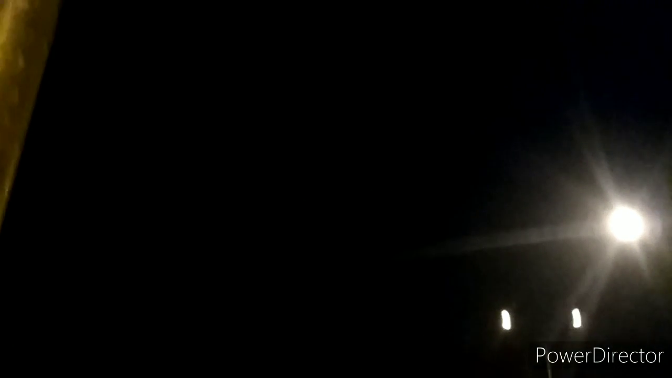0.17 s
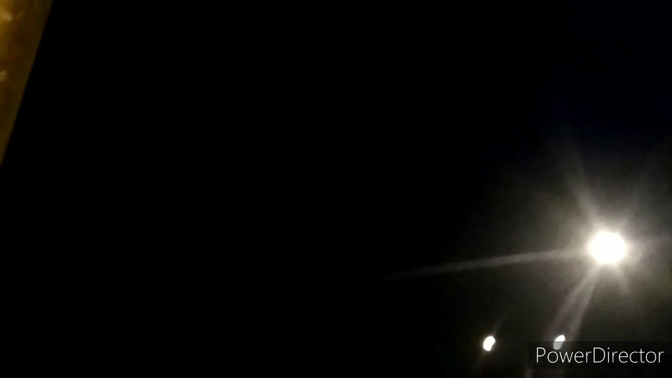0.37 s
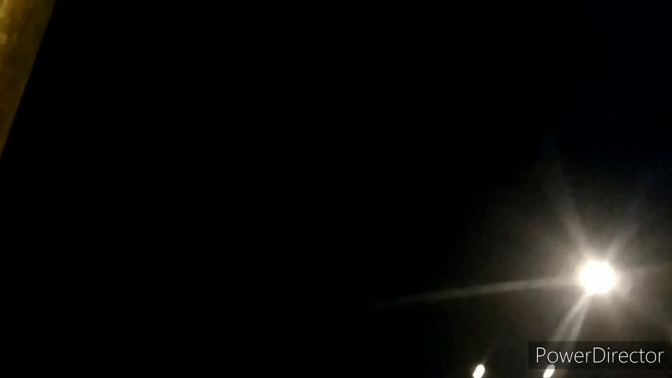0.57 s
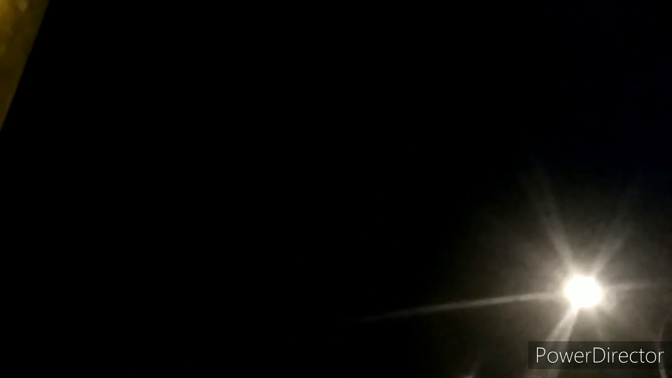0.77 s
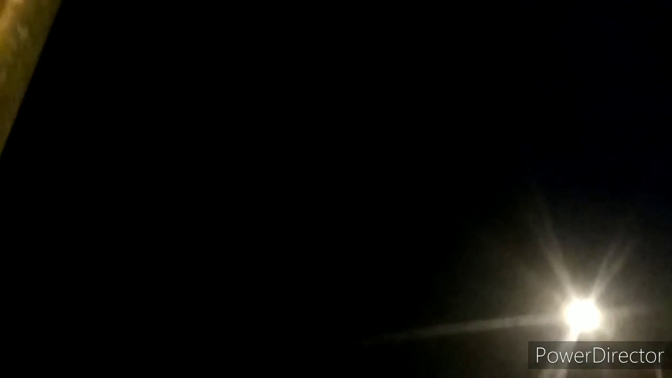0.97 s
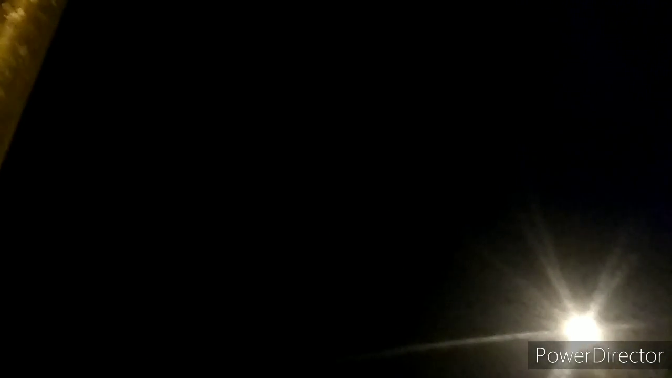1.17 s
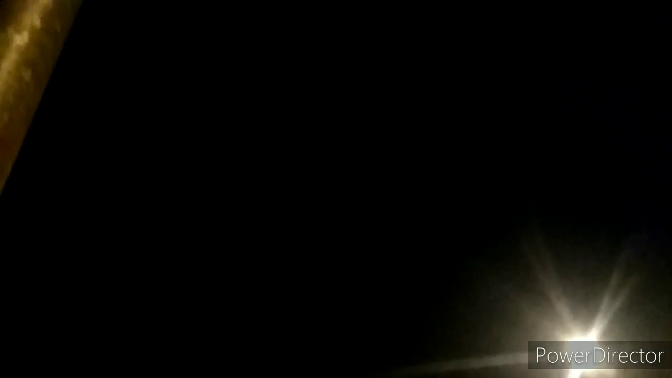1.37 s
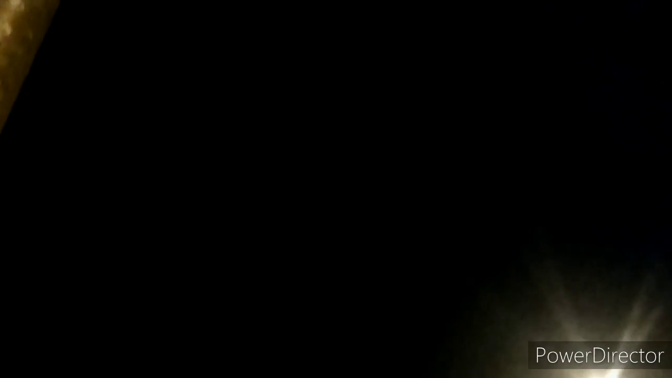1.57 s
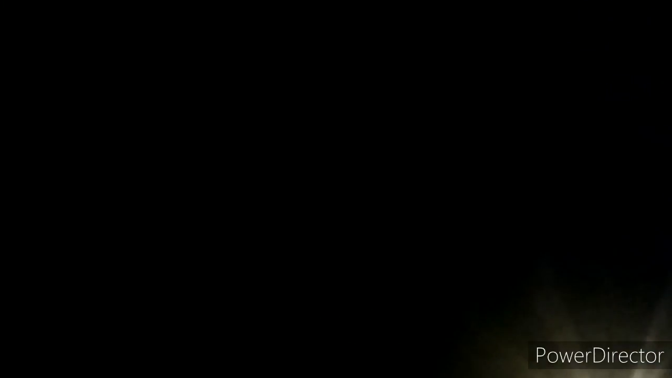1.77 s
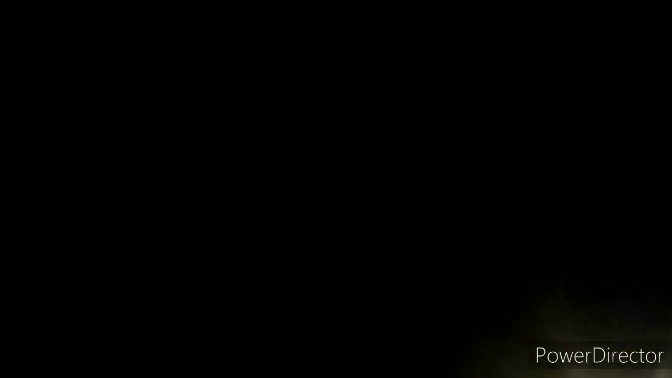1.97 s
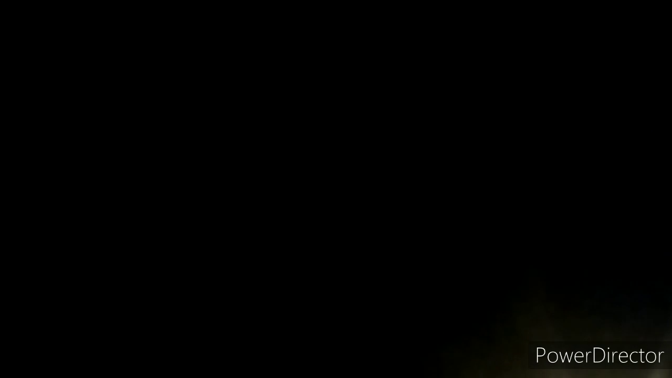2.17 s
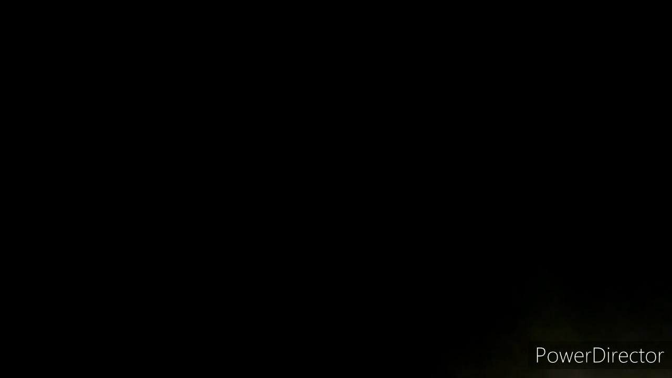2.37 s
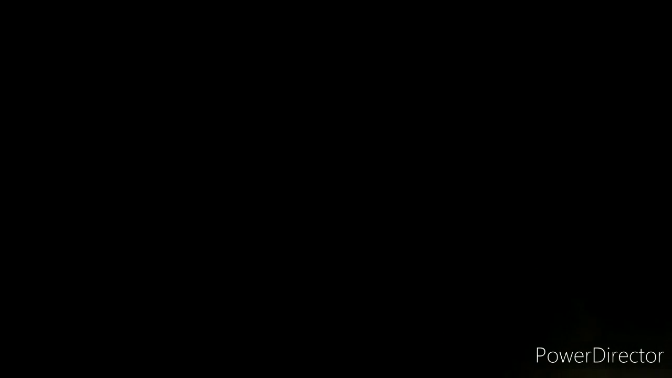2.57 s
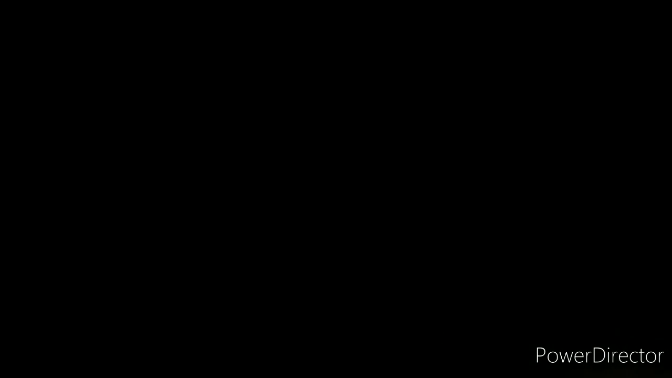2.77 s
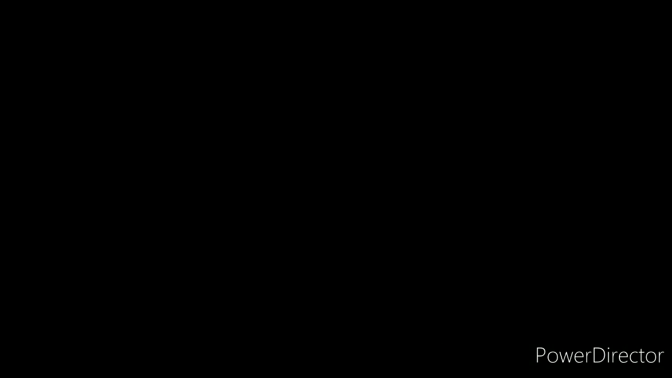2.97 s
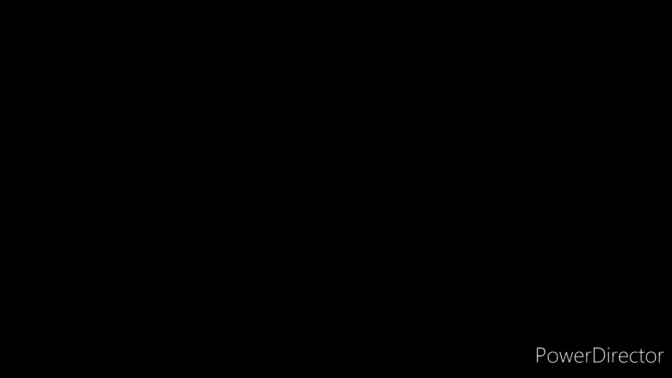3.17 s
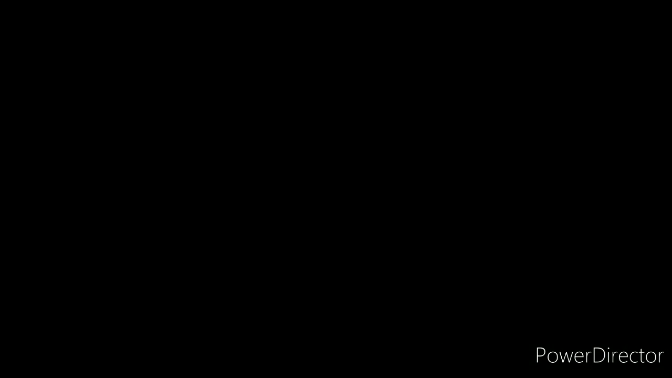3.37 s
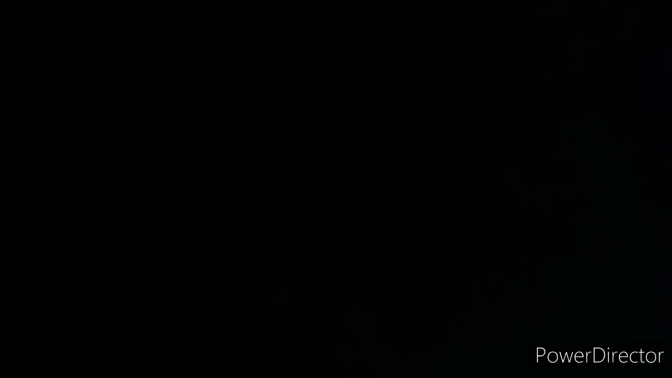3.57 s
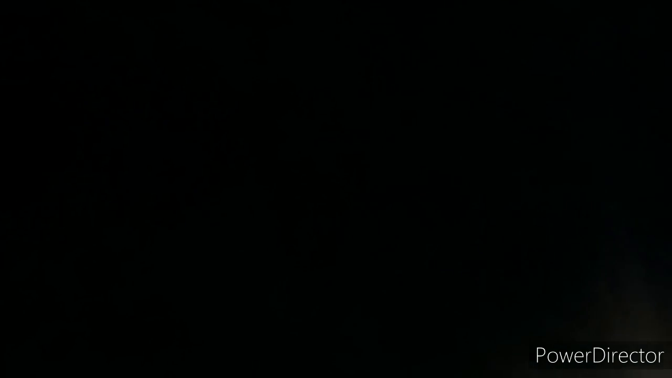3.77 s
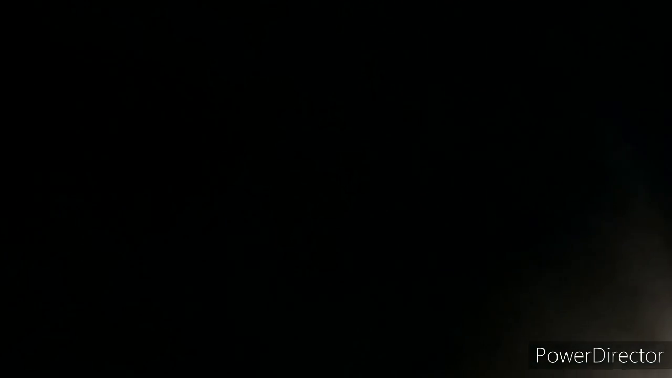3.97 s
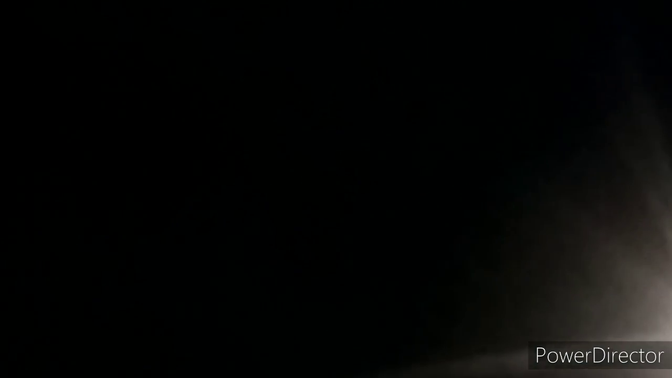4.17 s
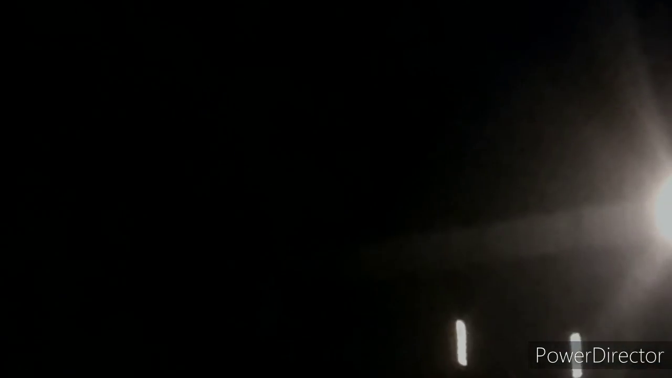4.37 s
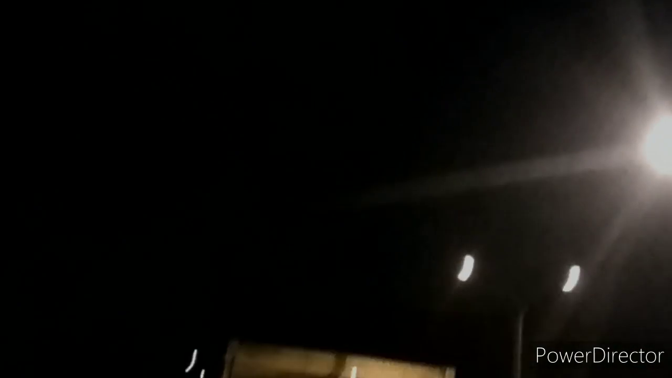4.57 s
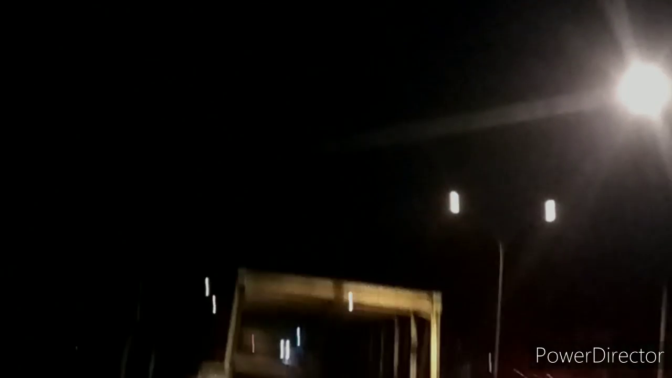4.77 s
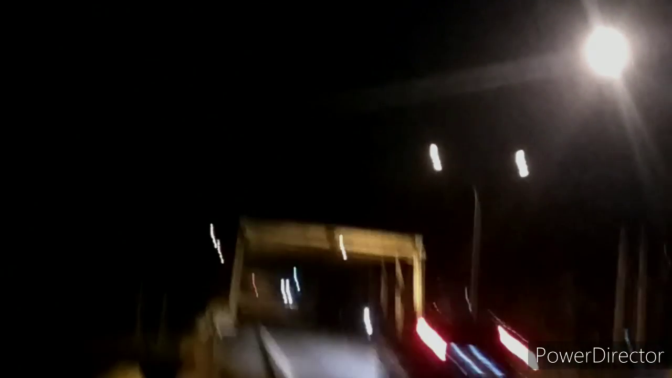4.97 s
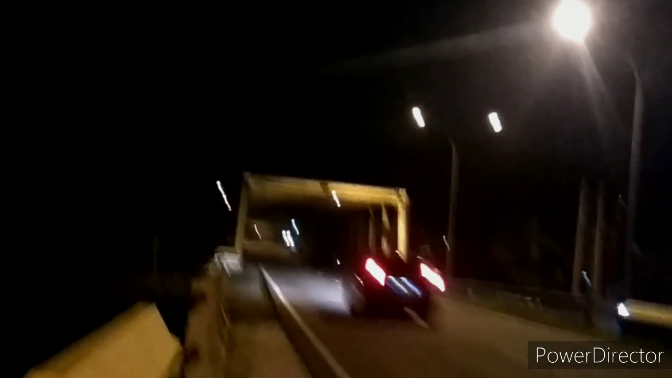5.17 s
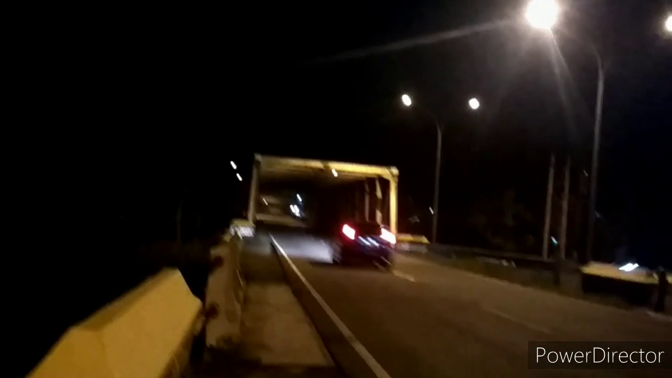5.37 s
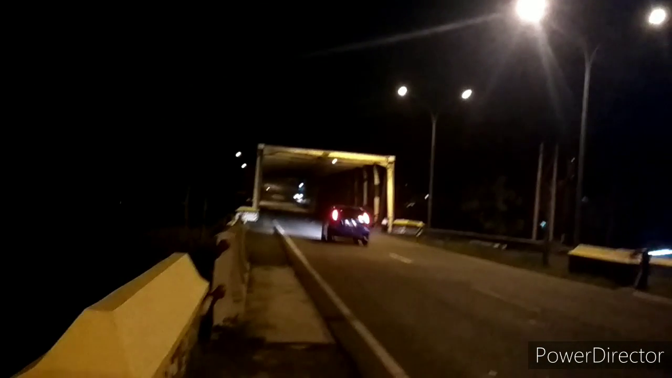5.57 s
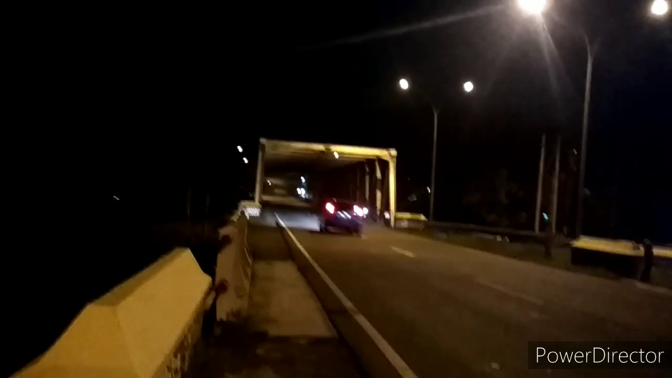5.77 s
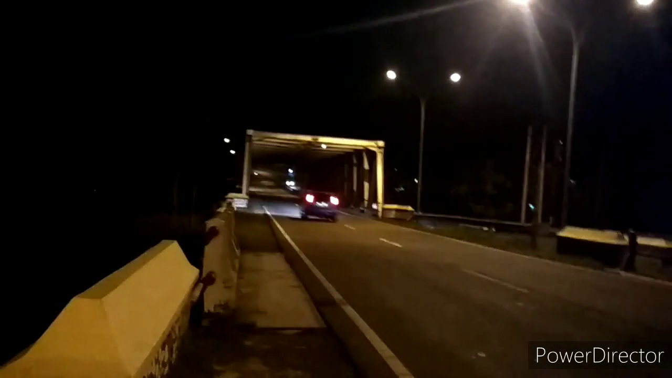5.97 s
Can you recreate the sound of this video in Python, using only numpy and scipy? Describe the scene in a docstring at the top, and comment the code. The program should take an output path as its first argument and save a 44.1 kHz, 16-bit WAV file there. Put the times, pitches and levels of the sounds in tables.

```python
"""A single-cylinder motorbike thuds past on hissing tyres and rides away, heard from the footway of a
road bridge at night. Each thud is a puff of exhaust gas ringing the silencer. After a brief break in
the sound a car passes and drives on toward the steel span: its engine drones, its tyres roar and its
wheels thump and knock on the deck. A cricket chirps by the road while the car goes by, and far-off
traffic rumbles under both vehicles."""
import sys
import numpy as np
from scipy import signal
from scipy.fft import rfft, irfft, next_fast_len
from scipy.io import wavfile
from scipy.ndimage import uniform_filter1d, minimum_filter1d, map_coordinates

SR = 44100
rng = np.random.default_rng(int(sys.argv[2]) if len(sys.argv) > 2 else 0)


def dump_mix(stems):
    """Bounce the given channels to the path in sys.argv[1] as a 16-bit WAV at rate SR."""
    frames = np.atleast_2d(stems).T  # one column per channel
    limited = np.clip(frames, -1, 1)  # hard clip at full scale
    pcm = np.round(limited * 32767).astype(np.int16)
    wavfile.write(sys.argv[1], SR, pcm)


N = 265923

# How often each engine fires; the rate sinks as the vehicle goes by: t/s, f/Hz
BIKE_FIRING = [(0, 32.5), (.8, 32.3), (1.18, 31.8), (1.3, 30.5), (1.5, 30.1), (1.8, 29.3), (2.3, 28.8),
               (3.5, 29.1)]
CAR_FIRING = [(3.55, 62.47), (4.2, 60.83), (4.8, 59.95), (5.2, 59.22), (5.55, 58.3), (6.03, 58.3)]
# How much louder each pitch of noise is on the left (+) or right (-): f/Hz, level/dB
BIKE_BALANCE = [(800, -1), (1100, 10.5), (1400, -3), (2500, -2.5), (4000, -3.5), (6000, -8), (8500, -9),
                (10500, -3.5), (13000, 0)]
CAR_BALANCE = [(1500, 0.5), (2200, 2.5), (3500, -2.5), (5000, -0.5), (8000, -1.5), (10800, -9), (12500, -2),
               (14500, 3)]
# The sound breaks off between the two vehicles and fades back in: t/s, level/dB
BREAK = [(3.521, 0), (3.54, -39), (3.55, -32), (3.557, -11), (3.71, 0)]

CAR_START_S = BREAK[1][0]
BIKE_NEAREST_S, BIKE_WIDTH_S = 1.3547, 0.43
UNMASK_S = (0.69, 0.804)  # from, to: the bike's body stops hiding the exhaust pipe
EASING_S = (1.62, 1.92)  # the throttle eases
TURN_AWAY_S = (2.6, 2.72)  # the pipe comes round to face us
THROTTLE_ATTACK_S, THROTTLE_RELEASE_S = 0.048, 0.079  # the engine takes this long to follow
CAR_TREAD_PEAK_S = 4.98


def amp(db):
    """Turns decibels into a number to multiply a sound by."""
    return 10 ** (np.asarray(db) / 20)


def unit(x):
    """Scales a signal to an average strength (rms) of 1."""
    return x / np.sqrt(np.mean(x ** 2) + 1e-20)


def clock():
    """The time of every sample, in seconds."""
    return np.arange(N) / SR


def along(points, hz):
    """Reads between the rows of a frequency table, on a musical (log) scale."""
    freqs, values = np.transpose(points)
    return np.interp(np.log(hz + 1), np.log(freqs + 1), values)


def curve(rows):
    """Joins (time, value) rows with straight lines, giving one value per sample."""
    return np.interp(clock(), *np.transpose(rows))


def wobble(rate):
    """A smooth random curve through `rate` new values a second."""
    return map_coordinates(rng.standard_normal(int(N * rate / SR) + 4), [clock() * rate])


def ramp(start, stop):
    """Rises from 0 to 1 between two times."""
    return np.clip((clock() - start) / max(stop - start, 1 / SR), 0, 1)


def held(start, stop, attack, release):
    """Stays at 1 between two times, fading in before and out after."""
    return ramp(start - attack, start) - ramp(stop, stop + release)


def distance(nearest_s, width_s):
    """How far off a vehicle on a straight road is; 1 is its closest. A small width is a quick pass."""
    return np.hypot(1, (clock() - nearest_s) / width_s)


def passing(peak_db, nearest_s, width_s, fall_db):
    """Level in dB of a sound going by; it loses fall_db at ten times the distance."""
    return peak_db - fall_db * np.log10(distance(nearest_s, width_s))


def filtered(x, response):
    """Multiplies each frequency in x by response(hz)."""
    size = next_fast_len(N + SR // 2)
    return irfft(rfft(x, size) * response(np.fft.rfftfreq(size, 1 / SR)), size)[..., :N]


def ring(x, spectrum, size=16384):
    """Lets x ring a hollow body whose tone is the given spectrum."""
    cepstrum = irfft(np.log(amp(along(spectrum, np.fft.rfftfreq(size, 1 / SR)))))
    cepstrum[1:size // 2] *= 2  # this folding makes the ringing follow the hit, never precede it
    cepstrum[size // 2 + 1:] = 0
    ringing = irfft(np.exp(rfft(cepstrum)))
    return signal.fftconvolve(x, ringing / np.linalg.norm(ringing))[:N]


def placed(x, ahead_ms=0.094, beside_ms=0.35):
    """Makes stereo: the more the vehicle is beside us, the earlier its sound arrives on the left."""
    bike_beside = 1 / distance(BIKE_NEAREST_S, BIKE_WIDTH_S) ** 2
    car_beside = 1 - ramp(4.58, 5.2)
    beside = np.where(clock() < CAR_START_S, bike_beside, car_beside)
    lead = (ahead_ms + (beside_ms - ahead_ms) * beside) / 1000 * SR
    return np.array([map_coordinates(x, [np.arange(N) + side * lead / 2]) for side in (1, -1)])


def rush(spectrum, balance, direct, flutter_db, left_to_right_ms=0.49):
    """Fluttering stereo noise of rms 1: a direct share from the vehicle, the rest from all around."""
    # long, low waves reach both sides alike; short, high ones do not
    spread = lambda hz: np.arccos(np.sinc(2 * hz * left_to_right_ms / 1000)) / 2
    white = rng.standard_normal((2, N))
    mid, side = filtered(white, lambda hz: np.array([np.cos(spread(hz)), np.sin(spread(hz))]))
    around = np.sqrt(1 - direct) * np.array([mid + side, mid - side])
    straight = np.sqrt(direct) * placed(rng.standard_normal(N))
    colour = lambda hz: amp(along(spectrum, hz) + along(balance, hz) * np.array([[.5], [-.5]]))
    return unit(filtered(around + straight, colour) * amp(flutter_db * wobble(35)))


def patchy(x, depth_db):
    """Narrow bands of a noise swell and sink by themselves, so it sounds hollow and wavering."""
    bands = signal.stft(x, nperseg=1024)[2]
    swell = uniform_filter1d(rng.standard_normal(bands.shape[1:]), size=4, axis=0)
    swell = uniform_filter1d(swell, size=9, axis=1)
    return unit(signal.istft(bands * amp(depth_db * unit(swell)), nperseg=1024)[1][:, :N])


def distant_traffic(db=-45):
    """A low, steady rumble from the road beyond the bridge."""
    # Tone of the rumble: f/Hz, level/dB
    rumble_tone = [(25, -3), (60, 4), (100, 8.5), (145, -32), (200, 9), (250, -11), (400, -26), (520, -13),
                   (1000, -53)]
    return amp(db) * rush(rumble_tone, CAR_BALANCE, direct=0.07, flutter_db=2)


def bike_tyres(throb_db=0.5):
    """Tyres rush on the asphalt and their tread sings; the high hiss throbs a little with the engine."""
    # Tones of the low roll, brighter rush, singing tread and high hiss: f/Hz, level/dB
    roll_tone = [(25, -10), (65, -3), (150, -10), (380, -10.5), (520, -30), (620, -7.5), (710, 0.5),
                 (920, 3), (1070, -5.5), (1200, -55), (1600, -89)]
    rush_tone = [(700, -41), (1190, -17), (1360, 1), (1700, -3), (1950, -1.5), (2800, -6), (3600, -23),
                 (4100, -46), (4900, -29), (7000, -22.5)]
    tread_tone = [(1000, -23), (1270, 4.5), (1400, 3), (1650, -8.5), (2300, -58)]
    hiss_tone = [(2000, -8), (3700, -7), (4300, -7.5), (4900, -32), (5600, -8.5), (8300, -8), (10000, 0),
                 (12500, 2), (15500, 0)]
    roll = patchy(rush(roll_tone, BIKE_BALANCE, direct=.3, flutter_db=1.5), depth_db=3)
    bright = patchy(rush(rush_tone, BIKE_BALANCE, direct=.25, flutter_db=1), depth_db=2.3)
    tread = patchy(rush(tread_tone, BIKE_BALANCE, direct=.3, flutter_db=1.2), depth_db=2.8)
    hiss = patchy(rush(hiss_tone, BIKE_BALANCE, direct=.1, flutter_db=.7), depth_db=3.2)
    # hypot adds the pass to a bed of road noise that slowly grows
    tyre_gain = np.hypot(amp(passing(-38, 1.35, 0.25, 25)), amp(-39 + 0.99 * clock()))
    hiss_gain = np.hypot(amp(passing(-28, 1.57, 0.66, 43.5)), amp(-45 + 2.37 * clock()))
    hiss_gain *= amp(4 + throb_db * np.cos(2 * np.pi * bike_cycles()))
    tread_gain = amp(passing(-34, 1.8, 1.26, 64)) * ramp(*UNMASK_S)
    return tyre_gain * (roll + amp(4) * bright) + tread_gain * tread + hiss_gain * hiss


def bike_cycles(zero_s=1.138):
    """Counts engine cycles from a strong firing just before the bike is nearest."""
    cycles = np.cumsum(curve(BIKE_FIRING)) / SR
    return cycles - np.interp(zero_s, clock(), cycles)


def exhaust_level(hidden_db=-13.5, pull_db_per_s=20):
    """Distance, the bike's body in the way, the throttle and pulling away set the exhaust's dB."""
    # Twists of the throttle: opens t/s, closes t/s, boost over idle/dB
    twists = [(0.53, 0.584, 16.5), (0.835, 1.87, 5.5), (2.018, 2.135, 7.5), (2.683, 2.774, 2),
              (3.43, 3.455, 4.5)]
    throttle_db = sum(db * held(opens, closes, THROTTLE_ATTACK_S, THROTTLE_RELEASE_S)
                      for opens, closes, db in twists)
    pull_db = pull_db_per_s * np.maximum(clock() - TURN_AWAY_S[0], 0)
    pass_db = passing(-17.5, BIKE_NEAREST_S, BIKE_WIDTH_S, 38.5)
    return pass_db + hidden_db * (1 - ramp(*UNMASK_S)) + throttle_db + pull_db


def exhaust_puffs(level_db, away, echoes=6):
    """One puff per firing, with echoes off the railings. Returns ordinary and hard puffs apart."""
    # Far firings are more uneven and echo more: distance (1 = closest), scatter/dB, echo strength
    near_far = [(1.4, 0.5, 0.12), (2.5, 1.3, 0.36)]
    # Single firings that bark out: t/s, level change/dB
    hard_firings = [(1.872, 1.5), (1.975, 3.5), (2.045, 1.5), (2.115, 8), (2.22, 10), (2.46, 3.5),
                    (2.70, 7), (2.80, 3.5), (2.90, 0), (2.94, 6), (3.01, 4), (3.115, 5), (3.18, 2.5),
                    (3.32, 5.5), (3.425, 2), (3.455, 5.5), (3.49, -2.5)]
    cycle = np.floor(bike_cycles())
    fired = np.flatnonzero(np.diff(cycle)) + 1  # the sample at which each firing falls
    count = len(fired)
    reach, *columns = np.transpose(near_far)
    scatter_db, echo = (np.interp(away[fired], reach, column) for column in columns)
    # every third firing is weak and a little late; every second one while the throttle eases
    easing = (fired > EASING_S[0] * SR) & (fired < EASING_S[1] * SR)
    weak = np.where(easing, cycle[fired] % 2 == 1, cycle[fired] % 3 == 2)
    hard_db = np.zeros(count)
    for s, db in hard_firings:
        hard_db[np.argmin(np.abs(fired / SR - s))] += db
    size = amp(level_db[fired] + hard_db - 5.5 * weak + scatter_db * rng.standard_normal(count))
    when = fired + SR * (.0007 * weak + .0002 * rng.standard_normal(count))
    # each puff arrives directly, then along new echo paths
    delays_s = np.c_[np.zeros(count), rng.uniform(.004, .04, (count, echoes))]
    gains = np.c_[np.ones(count), echo[:, None] * rng.standard_normal((count, echoes))]
    spacing = SR / curve(BIKE_FIRING)[fired]
    gains *= (size / np.linalg.norm(gains, axis=1) * np.sqrt(spacing))[:, None]
    arrivals = np.abs(when[:, None] + SR * delays_s).astype(int)
    return np.array([np.bincount(arrivals[kind].ravel(), gains[kind].ravel(), N)[:N]
                     for kind in (hard_db == 0, hard_db != 0)])


def muffled(thuds, hidden, cutoff_hz=212):
    """The note is dull while the pipe is hidden or the bike coasts; a throttle blip partly clears it."""
    dull = filtered(thuds, lambda hz: 1 / np.hypot(1, (hz / cutoff_hz) ** 4))
    coasting = ramp(1.45, 2.0) - ramp(2.58, 2.85)
    blip = held(2.11, 2.18, THROTTLE_ATTACK_S / 2, THROTTLE_RELEASE_S)
    dull_share = np.clip(hidden + .98 * coasting - .45 * blip, 0, 1)
    return thuds * (1 - dull_share) + dull * dull_share


def bike_exhaust(round_trip_s=.0063, returning_share=.36, leak_share=.22):
    """Puffs run up and down the pipe and ring the silencer; the tone rises once the pipe faces us."""
    # The silencer from the side, from behind, and from behind on a hard firing: f/Hz, level/dB
    side_tone = [(25, -44), (58, -1), (90, 4), (122, 1.5), (158, -0.5), (188, 2.5), (222, -10),
                 (260, -13.5), (315, -15), (345, -23.5), (400, -32), (480, -42), (1200, -66)]
    rear_tone = [(25, -26), (70, -18), (120, -6.5), (160, -9), (195, 5.5), (245, -4.5), (300, 2),
                 (360, -4.5), (440, -16.5), (540, -58), (1200, -63)]
    bark_tone = [(25, -33), (70, -19), (120, -4), (170, 0), (215, 5.5), (260, 1.5), (320, -1), (370, -11.5),
                 (440, -24), (540, -50), (1200, -64)]
    level_db = exhaust_level()
    hidden = 1 - ramp(*UNMASK_S)
    away = distance(BIKE_NEAREST_S, BIKE_WIDTH_S)
    rear_share = np.clip(hidden + .047 / away ** 2 + ramp(*TURN_AWAY_S), 0, 1)
    lap = lambda hz: np.exp(-2j * np.pi * hz * round_trip_s)  # a delay of one round trip
    # gas that leaks out just ahead of each puff softens its start
    pipe = lambda hz: (1 + leak_share / lap(hz)) / (1 - returning_share * lap(hz))
    soft, hard = filtered(exhaust_puffs(level_db, away), pipe)
    thuds = ring((soft + hard) * np.sqrt(1 - rear_share), side_tone)
    thuds += ring(soft * np.sqrt(rear_share), rear_tone)
    thuds += ring(hard * np.sqrt(rear_share), bark_tone)
    gas = amp(level_db - 18) * rush(side_tone, BIKE_BALANCE, direct=.2, flutter_db=1)
    return placed(-muffled(thuds, hidden)) + gas


def brake_squeals(attack_s=0.0076, release_s=0.029, waver_rad=0.51):
    """The brakes give thin, slightly unsteady tones that catch abruptly and die away."""
    # Each squeal: start t/s, stop t/s, f/Hz, level/dB
    squeals = [(0.13, 0.256, 5630, -45), (0.296, 0.347, 5650, -42), (0.866, 0.982, 3020, -28),
               (0.883, 0.98, 3440, -40.5)]
    out = np.zeros(N)
    for start, stop, hz, db in squeals:
        tone = np.sin(2 * np.pi * hz * clock() + waver_rad * wobble(73))
        out += amp(db) * held(start, stop, attack_s, release_s) * tone
    return placed(out)


def bike_alongside(db=-24.5):
    """For a moment the tyres face us side-on and their rush fills out."""
    # Tone of the tyres from the side: f/Hz, level/dB
    side_tone = [(500, -16), (700, 1), (1150, 1), (1500, 2), (2000, 4), (3000, -7), (4200, -2.5),
                 (5000, -19), (8000, -12.5), (12500, 2.5), (15500, -10.5)]
    swell = amp(db) / distance(nearest_s=1.198, width_s=0.18) ** 2
    return swell * rush(side_tone, BIKE_BALANCE, direct=0.17, flutter_db=1.5)


def valve_ticks(hz=8800, width_hz=900, fade_s=0.021, accent_db=6, pull_db=10):
    """From behind, the bike's valves tick once a firing, every third louder, harder as it pulls."""
    cycle, part = np.divmod(bike_cycles(), 1)
    since_s = part / curve(BIKE_FIRING)
    accented = cycle % 3 == 1
    metal = filtered(rng.standard_normal((2, N)), lambda f: np.exp(-((f - hz) / width_hz) ** 2))
    ticks = unit(metal * amp(-60 * since_s / fade_s + accent_db * accented + 2.2 * wobble(36)))
    left_right = amp([[-5], [3]])
    return ticks * ramp(*EASING_S) * amp(-51 + pull_db * ramp(2.98, 3.16)) * left_right


def bike_spits(attack_s=0.0051, fade_s=0.21):
    """Brief, bright spurts of hiss as the bike picks up again."""
    # Each spurt: t/s, level/dB
    spurts = [(2.617, -26), (2.645, -30), (2.674, -26)]
    # Tone of the hiss: f/Hz, level/dB
    hiss_tone = [(2500, -14), (4200, 0), (4900, -39), (6000, -1.5), (10000, 5), (15500, 4)]
    gain = sum(amp(db - 60 * np.maximum(clock() - s, 0) / fade_s) * ramp(s - attack_s, s)
               for s, db in spurts)
    return gain * rush(hiss_tone, BIKE_BALANCE, direct=0.15, flutter_db=0)


def car_engine(waver_db=2, rough_db=1.7, hidden_db=-4):
    """Uneven firing shakes a stack of tones; each swells and fades as its paths over the road change."""
    # Engine tones: multiple of the firing rate, peak level/dB, loudest t/s, width/s, fall/dB
    overtones = [(1, -28, 4.0, .5, 15), (1.5, -28, 3.8, .3, 10), (2, -19.5, 4.36, .45, 11),
                 (3, -24.5, 4.6, 0.9, 9), (4, -19.5, 4.22, .12, 20), (5, -24, 4.98, 0.52, 19),
                 (6, -22, 4.15, .1, 30), (6, -19.5, 4.68, 0.27, 14), (7, -31, 5, 0.31, 20),
                 (8, -36, 5.5, .5, 15)]
    phase = 2 * np.pi * np.cumsum(curve(CAR_FIRING)) / SR + .035 * wobble(45)
    drone = np.zeros(N)
    for multiple, *swell in overtones:
        gain = amp(passing(*swell) + waver_db * wobble(7))
        drone += gain * np.sin(multiple * phase + 0.27 * wobble(12) + rng.uniform(0, 2 * np.pi))
    return placed(drone * amp(rough_db * wobble(50) + hidden_db * (1 - ramp(3.74, 4))))


def sinking(x):
    """Every pitch in a stereo noise sinks with the engine note as the car goes by."""
    rate = curve(CAR_FIRING)
    position = np.cumsum(rate / np.interp(CAR_TREAD_PEAK_S, clock(), rate))
    return np.array([map_coordinates(side, [position], mode="mirror") for side in x])


def car_tyres():
    """A low roar as the car draws level, a rush and sizzle as it passes, then its tread sings."""
    # Tones of the six layers of road noise: f/Hz, level/dB
    rumble_tone = [(20, -24), (45, -8.5), (90, 3.5), (150, 0.5), (210, -2.5), (270, 0), (400, -5),
                   (520, -10.5), (900, -53), (2000, -70)]
    roar_tone = [(200, -15), (420, -6), (620, 0.5), (850, -4.5), (1100, -1), (1600, -8), (3000, -59),
                 (8000, -85)]
    rush_tone = [(500, -14), (900, -5), (1250, 3), (1700, 5), (2050, 0), (2500, -4.5), (3200, -17),
                 (4500, -41), (8000, -65)]
    tread_tone = [(500, -5.5), (880, -24), (1100, 2.5), (1300, 1), (1700, -3), (2200, -11), (2900, -20),
                  (4500, -26.5), (8000, -60)]
    hiss_tone = [(1500, -3), (3500, 1.5), (5000, 3.5), (6500, 0), (8500, 0.5), (10800, 4), (13000, 3),
                 (15500, -1)]
    sizzle_tone = [(2000, -13), (3500, 3), (6000, 1), (8300, -2.5), (9700, 4.5), (11000, 1), (12500, -7),
                   (15500, -6)]
    rumble = rush(rumble_tone, CAR_BALANCE, direct=.45, flutter_db=1.3)
    roar = rush(roar_tone, CAR_BALANCE, direct=.7, flutter_db=.7)
    bright = patchy(rush(rush_tone, CAR_BALANCE, direct=.6, flutter_db=.6), depth_db=2)
    tread = patchy(rush(tread_tone, CAR_BALANCE, direct=.75, flutter_db=.5), depth_db=1.2)
    hiss = patchy(rush(hiss_tone, CAR_BALANCE, direct=.1, flutter_db=.5), depth_db=2)
    sizzle = rush(sizzle_tone, CAR_BALANCE, direct=.15, flutter_db=.5)
    facing_db = -4 * (1 - ramp(4.56, 4.72))  # the tread is loudest from behind the car
    hidden_db = -3 * (1 - ramp(3.88, 3.97))  # the treble opens up as the car comes near
    return (amp(passing(-14.6, 4.25, 0.5, 11) - 4.5) * rumble
            + amp(passing(-21, 4.36, 0.17, 16) + 3.5) * roar
            + amp(passing(-21.6, 4.45, 0.26, 23) + 2) * sinking(bright)
            + amp(passing(-21.5, CAR_TREAD_PEAK_S, 0.6, 30) + facing_db + 1.5) * sinking(tread)
            + amp(passing(-35.3, 4.35, 0.5, 10.5) + hidden_db + 4) * hiss
            + amp(passing(-30.5, 4.55, 0.25, 32)) * sizzle)


def cricket(hz=7700, width_hz=280, chirps_per_s=6.4):
    """Evenly spaced, raspy chirps from the right."""
    chirps = np.maximum(np.cos(2 * np.pi * chirps_per_s * (clock() - 5.08)), 0) ** 2
    rasp = unit(filtered(rng.standard_normal((2, N)), lambda f: np.exp(-((f - hz) / width_hz) ** 2)))
    left_right = amp([[-4], [4]])
    return amp(-42.5 + 1.3 * wobble(6)) * chirps * rasp * left_right


def deck_thumps(attack_s=0.0068):
    """Each axle rolls onto the slab beside us and sets off a soft, low boom."""
    # Each axle's thump: t/s, level/dB
    axles = [(4.13, -6.5), (4.239, -10)]
    # The slab's ringing notes: f/Hz, relative level/dB, fade time/s (to 60 dB down)
    slab_notes = [(92.5, -3, 0.18), (136, -21, 0.073), (242, 1.5, 0.12)]
    t, out = np.arange(SR // 4) / SR, np.zeros(N)
    boom = sum(amp(db - 60 * t / fade_s) * np.sin(2 * np.pi * hz * t) for hz, db, fade_s in slab_notes)
    boom *= 1 - np.exp(-t / attack_s)
    for s, db in axles:
        out[round(s * SR):][:len(t)] += amp(db) * boom
    return placed(out)


def deck_knocks(crack_db=-24, crack_fade_s=.003):
    """The wheels strike the deck: short, dead clacks with a crack on top."""
    # Each strike: t/s, peak level/dB, fade time/s (to 60 dB down)
    knocks = [(4.916, -12, .012), (5.0515, -4.5, .02), (5.0545, -4, .008), (5.0818, -1.5, .01),
              (5.1858, -4.5, .007), (5.2138, -5, .007)]
    # The deck's ringing notes: f/Hz, relative level/dB
    deck_notes = [(1050, -14), (1530, 12), (2150, -14)]
    t, out = np.arange(SR // 20) / SR, np.zeros(N)
    for s, db, fade_s in knocks:
        clack = sum(amp(level + rng.normal(0, 1.92) - 60 * t / fade_s) * np.sin(2 * np.pi * hz * t)
                    for hz, level in deck_notes)
        crack = amp(crack_db - 60 * t / crack_fade_s) * rng.standard_normal(len(t))
        out[round(s * SR):][:len(t)] += amp(db) * (clack / np.abs(clack).max() + crack)
    return placed(out)


def scene():
    """The bike, a moment of near silence, then the car and the cricket."""
    bike = bike_exhaust() + valve_ticks() + bike_tyres() + bike_alongside()
    bike += brake_squeals() + bike_spits()
    car = car_engine() + car_tyres() + deck_thumps() + deck_knocks()
    nearby = np.where(clock() < CAR_START_S, bike, car + cricket())
    return (nearby + distant_traffic()) * amp(curve(BREAK))


def record(dry, ceiling=.96, top_hz=15700):
    """A limiter turns the loudest thuds down, and the very highest treble is cut off."""
    needed = np.minimum(1, ceiling / (np.abs(dry).max(axis=0) + 1e-9))
    gain = uniform_filter1d(minimum_filter1d(needed, size=600), size=500)
    return filtered(dry * gain, lambda hz: hz < top_hz)


dry = scene()
out = record(dry)
dump_mix(out)
```